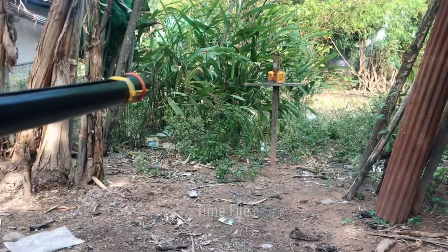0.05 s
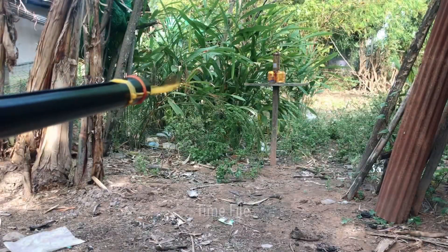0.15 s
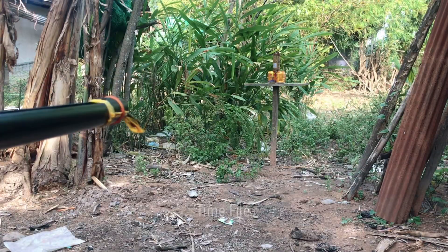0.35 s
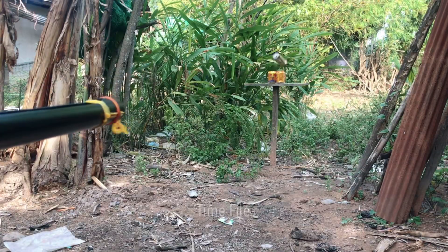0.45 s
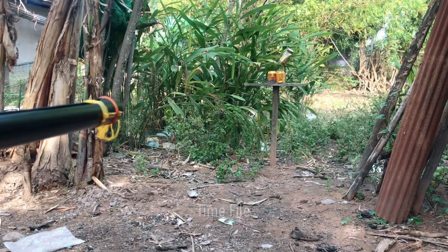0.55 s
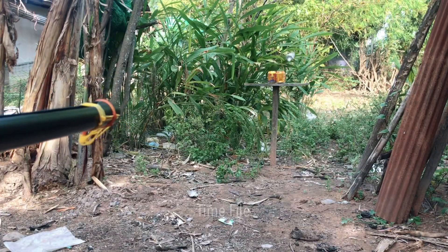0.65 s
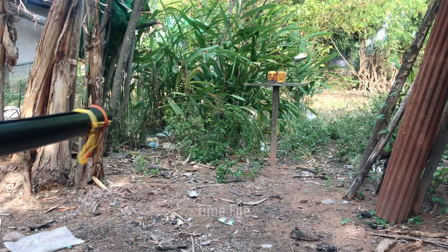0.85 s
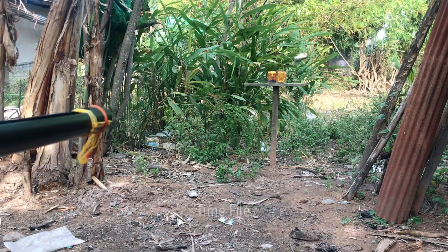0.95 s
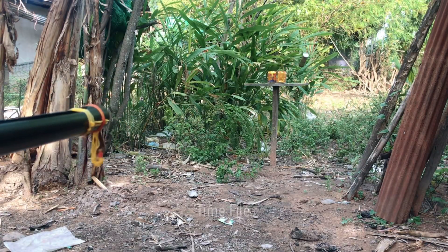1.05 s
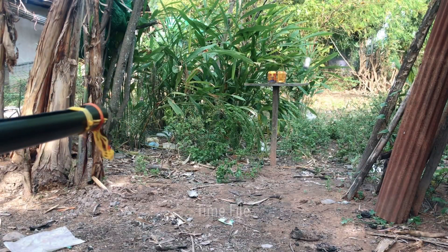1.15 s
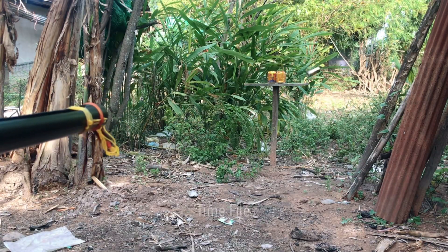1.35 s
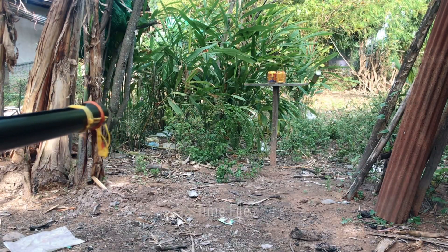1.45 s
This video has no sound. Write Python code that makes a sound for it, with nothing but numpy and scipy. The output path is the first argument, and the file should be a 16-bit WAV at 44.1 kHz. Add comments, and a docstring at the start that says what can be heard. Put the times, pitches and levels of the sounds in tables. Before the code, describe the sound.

A slingshot built on a tube fires in a yard. Faint hiss and wind, a light tick at 0.1 s, rattling from 0.17, then hard hollow slaps around 0.22 and, loudest, 0.31, with short diffuse echoes. Faint gritty rustles follow at 0.42-0.5. At 0.54 the shot cracks, crashing and humming like sheet metal as it fades. Near 1.25 a piece thuds down and rolls grittily. Narrow phone sound, peaks overloaded.

```python
"""In a yard, a slingshot built on a tube fires: bands drag and rattle along the tube and slap it in two loud clusters.
Random clicks ring the tube's resonances, ticks and short notes make the slaps, and decaying noise gives the echoes.
After brief gritty rustles the shot cracks on a target in front of sheet metal: tones thump, noise bands crash and
modes hum on, over a faint, slowly fading hiss. Gritty noise bursts and a thud make a piece drop to the ground later.
A narrow-band phone microphone hears it over faint hiss and wind, and overloads on the peaks."""
import sys
import numpy as np
from scipy import signal
from scipy.fft import rfft, irfft
from scipy.io import wavfile
from scipy.ndimage import uniform_filter1d

SR = 44100
rng = np.random.default_rng(int(sys.argv[2]) if len(sys.argv) > 2 else 0)


def wav_out(sig):
    """Save sig, one row per channel (or a flat mono array), as 16-bit PCM at SR to the path in sys.argv[1]."""
    wavfile.write(sys.argv[1], SR, np.round(np.clip(np.atleast_2d(sig).T, -1, 1) * 32767).astype(np.int16))


N = 66150  # samples, 1.5 s

HISS_DB, HISS_FLICKER_DB = -58.5, 1.0
WIND_DB, WIND_HZ = -49, 33
GUST_DB, GUSTS_PER_S = 3.5, 25
RATTLE_PER_S, RATTLE_SCATTER_DB = 2500, 2.5
RECOIL_DB, RECOIL_HZ = -34, 110
RECOIL_FOLLOW = 0.2  # dB of recoil per dB of rattle
SLAP_T60_S, SLAP_RISE_S = 0.016, 0.00066
SLAP_GAIN_DB, SLAP_TICK_DB = 1.5, -5.5
SLAP_OVERTONE, SLAP_OVERTONE_DB = 1.6, -10  # overtone as a multiple of the pitch
YARD_T60_S, YARD_RISE_S, YARD_DB = 0.46, 0.0075, -20
YARD_LOW_HZ, YARD_LOW_DB = 474, 1.5
GRIT_FLICKER_DB, GRIT_FLICKERS_PER_S = 1.2, 400
BURST_RISE_S = 0.0012
CRACK_S = .5398
CRASH_HOLD_S, CRASH_RISE_S = 0.036, 0.00055
CRASH_FLICKER_DB, CRASH_FLICKERS_PER_S = 1.2, 59.07
FLUTTER_PER_S = 22
DROP_THUD_DB, DROP_THUD_HZ, DROP_THUD_T60_S = -35.5, 105, 0.15
MIC_HZ, MIC_STEEP_HZ, TOP_HZ = 4350, 5473, 15700
KNEE, BEND, CLIP = .25, .06, .98


def undb(db):
    """Gain of a dB value."""
    return 10 ** (np.asarray(db) / 20)


def unit(x):
    """Scale to rms 1."""
    return x / np.sqrt(np.mean(x ** 2))


def since(t0):
    """Seconds after t0, and a gate that opens there."""
    t = np.arange(N) / SR - t0
    return np.maximum(t, 0), np.clip(t * SR, 0, 1)


def rise(s, rise_s):
    """Exponential approach to full level."""
    return 1 - np.exp(-s / rise_s)


def fade(s, t60_s):
    """Exponential decay, 60 dB in t60_s."""
    return undb(-60 * s / t60_s)


def sine(hz, s):
    """Steady tone over the seconds s."""
    return np.sin(2 * np.pi * hz * s)


def band(x, hz, width_hz):
    """Resonant band-pass."""
    return signal.lfilter(*signal.iirpeak(hz, hz / width_hz, fs=SR), x)


def coloured(points):
    """Noise shaped by (pitch_hz, level_db) points along log frequency, rms 1."""
    hz = np.arange(N // 2 + 1) * SR / N + 1
    points = np.array(points, float)
    level_db = np.interp(np.log(hz), np.log(points[:, 0]), points[:, 1])
    return unit(irfft(rfft(rng.standard_normal(N)) * undb(level_db), N))


def walk(rate):
    """Random levels held 1 / rate s and slewed twice; spread near 1."""
    hold = int(SR / rate)
    steps = np.repeat(rng.standard_normal(N // hold + 1), hold)
    return 1.3 * uniform_filter1d(uniform_filter1d(steps, hold), hold)[:N]


def lows(hz):
    """Rumble between 15 Hz and hz, rms 1."""
    sos = signal.butter(2, [15, hz], "bandpass", fs=SR, output="sos")
    return unit(signal.sosfilt(sos, rng.standard_normal(N)))


def air():
    """Faint hiss and gusty wind rumble on the microphone, each noise with a wandering level."""
    # spectrum of the yard hiss: pitch_hz [Hz], level_db [dB, relative]
    hiss_spectrum = [(59, -35), (100, 0), (534, -11.5), (674, -19.5), (987, -3), (1150, -18), (3260, -14),
                     (5270, -17), (6850, -57.5), (11600, -120)]
    hiss = coloured(hiss_spectrum) * undb(HISS_DB + HISS_FLICKER_DB * walk(24))
    wind = lows(WIND_HZ) * undb(WIND_DB + GUST_DB * walk(GUSTS_PER_S))
    return hiss + wind


def band_rattle():
    """Dense uneven clicks of the dragging bands ring the tube's resonances and shake the grip."""
    # rattle level along the tube: time_s [s], level_db [dB]
    rattle_curve = np.array([(0.15, -61.5), (0.151, -43), (0.167, -41.5), (0.17, -36), (0.183, -37),
                             (.186, -36.5), (0.21, -33), (0.214, -15.5), (0.232, -18.5), (0.236, -23.5),
                             (0.277, -24.5), (0.282, -32), (0.289, -26.5), (0.297, -15), (0.321, -12.5),
                             (.328, -27), (.338, -30), (.35, -44.5)])
    # resonances of the tube: pitch_hz [Hz], width_hz [Hz, before a lower limit], level_db [dB]
    tube = [(470, 450, -8), (832, 380, -1), (1460, 660, -7), (2670, 480, -6), (4030, 800, -5.5),
            (4570, 800, -6.5)]
    struck = rng.random(N) < RATTLE_PER_S / SR
    strength = undb(RATTLE_SCATTER_DB * rng.exponential(size=N))
    clicks = np.sign(rng.standard_normal(N)) * struck * strength
    ringing = np.zeros(N)
    for k, (hz, width_hz, level_db) in enumerate(tube):
        polarity = (-1) ** k
        ringing += polarity * undb(level_db) * band(clicks, hz, max(width_hz, hz / 4.5, 300))
    t = np.arange(N) / SR
    db = np.interp(t, rattle_curve[:, 0], rattle_curve[:, 1], left=-120, right=-120)
    active = uniform_filter1d(1. * (db > -100), 1500)  # edges softened over 34 ms
    recoil = lows(RECOIL_HZ) * undb(RECOIL_DB + RECOIL_FOLLOW * db) * active
    return unit(ringing) * undb(db) + recoil


def slaps():
    """Each slap of the bands on the tube is a noise tick and a short hollow note with one overtone."""
    # slaps: start_s [s], level_db [dB, before the shared gain], pitch_hz [Hz]
    slap_list = [(.107, -39, 900), (.1705, -20, 586), (.1745, -25.5, 620), (.2195, -9.5, 917),
                 (.2250, -2.5, 1040), (.2945, -14, 1276), (.3005, -14, 960), (.3062, 2.5, 796),
                 (.3168, 0, 792), (.3345, -21, 750)]
    tick = unit(band(rng.standard_normal(N), 3500, 2600))
    out = np.zeros(N)
    for start_s, level_db, hz in slap_list:
        s, gate = since(start_s)
        env = gate * rise(s, SLAP_RISE_S) * fade(s, SLAP_T60_S) * undb(level_db + SLAP_GAIN_DB)
        note = sine(hz, s) + undb(SLAP_OVERTONE_DB) * sine(SLAP_OVERTONE * hz, s)
        out += env * (note + undb(SLAP_TICK_DB) * tick)
    return out


def yard(x):
    """Diffuse echoes off trunks and fences: the sound convolved with a decaying noise tail."""
    s = np.arange(N // 2) / SR
    noise = rng.standard_normal(N // 2)
    colour = band(noise, 4000, 10000) + undb(YARD_LOW_DB) * band(noise, YARD_LOW_HZ, 400)
    tail = colour * fade(s, YARD_T60_S) * rise(s, YARD_RISE_S)
    tail = tail / np.sqrt(np.sum(tail ** 2))  # unit energy
    return signal.fftconvolve(x, tail)[:N] * undb(YARD_DB)


def gritty_bursts(events):
    """Flickering coloured noise under a quick rise and decay for each (start_s, level_db, t60_s)."""
    # spectrum of the grit: pitch_hz [Hz], level_db [dB, relative]
    grit_spectrum = [(35, -40), (60, -5.5), (589, -6), (857, -5.5), (1030, -7), (1220, -8), (3980, -9.5),
                     (5270, -7), (6850, -66), (11600, -120)]
    grit = coloured(grit_spectrum) * undb(GRIT_FLICKER_DB * walk(GRIT_FLICKERS_PER_S))
    env = np.zeros(N)
    for start_s, level_db, t60_s in events:
        s, _ = since(start_s)
        env += rise(s, BURST_RISE_S) * undb(level_db) * fade(s, t60_s)
    return grit * env


def rustles_and_hiss():
    """Brief gritty rustles before the crack, and a faint, slowly fading hiss after it."""
    # noise bursts, the last one the long hiss: start_s [s], level_db [dB], t60_s [s]
    bursts = [(0.423, -52, 0.15), (0.463, -44, 0.3), (0.494, -54, 0.09), (0.506, -50, 0.12), (.6, -48, 4.5)]
    return gritty_bursts(bursts)


def thump(s):
    """The blow on the target, as decaying low tones."""
    # tones of the blow: pitch_hz [Hz], level_db [dB], t60_s [s]
    blow = [(285, -5, .08), (680, -9, .08)]
    return sum(undb(level_db) * fade(s, t60_s) * sine(hz, s) for hz, level_db, t60_s in blow)


def crash(s):
    """Quarter-octave noise bands that hold, then die in two stages, with a flickering level."""
    # crash by band: pitch_hz [Hz], level_db [dB], t60_s [s], tail_level_db [dB], tail_t60_s [s]
    crash_bands = np.array([(72.5, -47, 1, -50.5, 1.7), (140, -28.5, 0.26, -34.5, 0.95),
                            (280, -32.5, 0.66, -35, 1.69), (550, -23.5, 0.25, -31.5, 1.37),
                            (1040, -23, 0.21, -24.5, 0.89), (1850, -20.5, 0.48, -33, 1.18),
                            (2910, -13.5, 0.19, -28, 0.99), (3234, -27.5, 0.13, -32, 1.1),
                            (4044, -4.5, 0.27, -17.5, 0.78), (4970, -11, 0.48, -29.5, 1.01)])
    after_hold = np.maximum(s - CRASH_HOLD_S, 0)
    out = np.zeros(N)
    for hz in 60 * 2 ** (np.arange(26) / 4):
        level_db, fast_s, tail_db, slow_s = (
            np.interp(np.log(hz), np.log(crash_bands[:, 0]), crash_bands[:, k]) for k in range(1, 5))
        noise = rng.standard_normal(N)
        hiss = unit(band(band(noise, hz, hz / 4), hz, hz / 4))
        # the long tail fades from the crack itself, without the hold
        env = np.hypot(undb(level_db) * fade(after_hold, fast_s), undb(tail_db) * fade(s, slow_s))
        flicker = undb(CRASH_FLICKER_DB * walk(CRASH_FLICKERS_PER_S))
        out += hiss * env * rise(s, CRASH_RISE_S) * flicker
    return out


def sheet_hum(s):
    """The struck sheet metal hums in decaying modes whose levels flutter."""
    # modes of the sheet: pitch_hz [Hz], level_db [dB, before flutter], t60_s [s], flutter_db [dB]
    modes = [(114.4, -39, 1.2, 9), (261, -34.5, 1.7, 2), (280, -19.5, 0.53, -2), (279.5, -29, 1.94, 4),
             (323.2, -29.5, 3.56, 2), (384, -39.5, 2.4, 3.5), (426, -33, 1.78, 5.5), (565.7, -30, 1.21, 3),
             (735, -41.5, 1.4, 7.5), (1197, -15.5, .3, 1), (718, -28.5, 0.19, 5.5), (2710, -20, 0.65, 4.5),
             (3835, -19, 0.13, 4), (4450, -18.5, 0.31, -1)]
    out = np.zeros(N)
    for hz, level_db, t60_s, flutter_db in modes:
        flutter = flutter_db * np.minimum(s * 10, 1) * walk(FLUTTER_PER_S)  # grows in over 0.1 s
        out += undb(level_db + flutter) * fade(s, t60_s) * sine(hz, s)
    return out


def crack():
    """The shot hits: thump, crash and sheet hum start together."""
    s, gate = since(CRACK_S)
    return gate * (thump(s) + crash(s) + sheet_hum(s))


def drops():
    """A piece lands and rolls in gritty bursts; the first landing also thuds as a low tone."""
    # landings: start_s [s], level_db [dB], t60_s [s]
    landings = [(1.2529, -25.5, 0.074), (1.265, -33, 0.083), (1.281, -40.5, 0.49), (1.348, -36, 0.17),
                (1.384, -46.5, 0.52)]
    s, gate = since(landings[0][0])
    thud = gate * undb(DROP_THUD_DB) * fade(s, DROP_THUD_T60_S) * sine(DROP_THUD_HZ, s)
    return thud + gritty_bursts(landings)


def scene():
    """Air, launch with its echoes, rustles and hiss, crack and drops."""
    shot = band_rattle() + slaps()
    return (air() + shot + yard(shot) + rustles_and_hiss() + crack() + drops())[None]


def record(dry):
    """A narrow microphone band, overload that bends above the knee and then clips, and the top cut."""
    x = signal.sosfilt(signal.butter(6, MIC_HZ, fs=SR, output="sos"), dry)
    x = signal.sosfilt(signal.ellip(8, .5, 75, MIC_STEEP_HZ, fs=SR, output="sos"), x)
    over = np.maximum(np.abs(x) - KNEE, 0)
    bent = x - np.sign(x) * BEND * over ** 3
    x = np.clip(bent, -CLIP, CLIP)
    return signal.sosfilt(signal.ellip(8, .2, 40, TOP_HZ, fs=SR, output="sos"), x)


dry = scene()
out = record(dry)
wav_out(out)
```